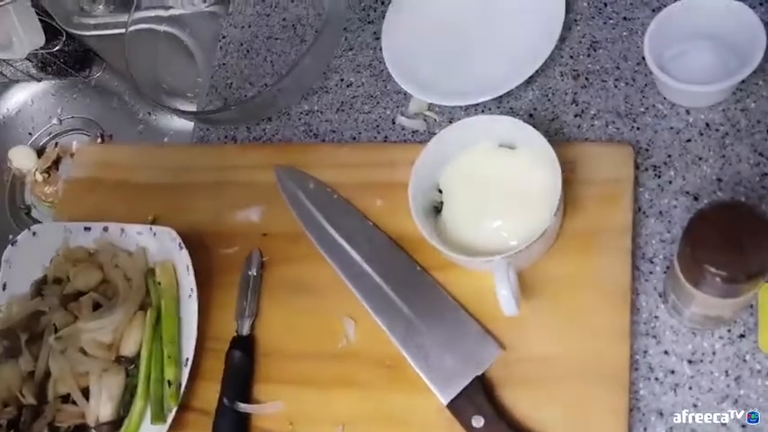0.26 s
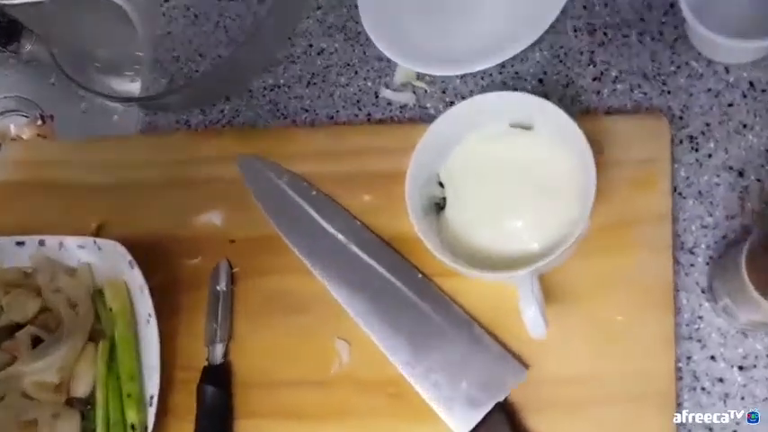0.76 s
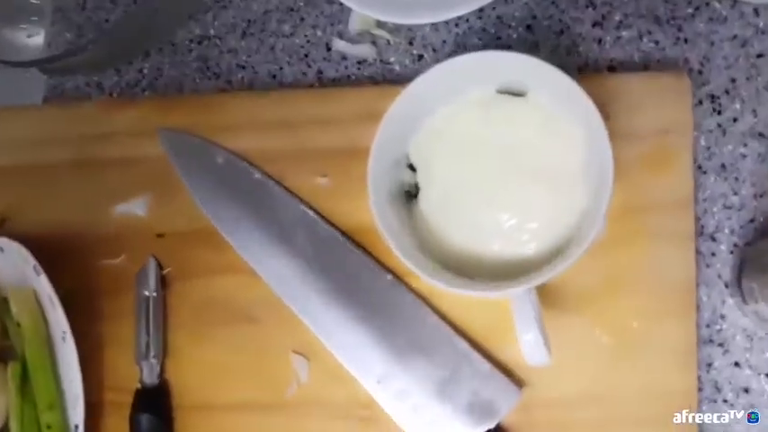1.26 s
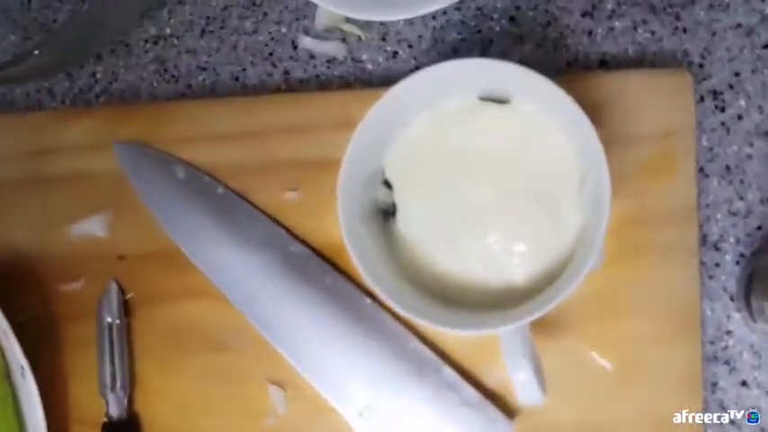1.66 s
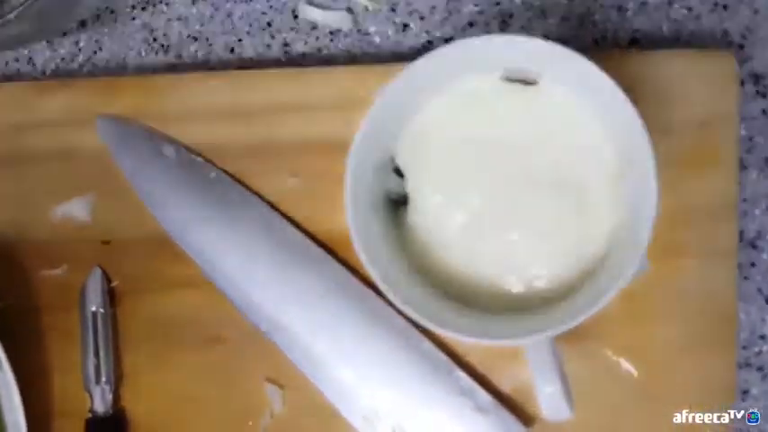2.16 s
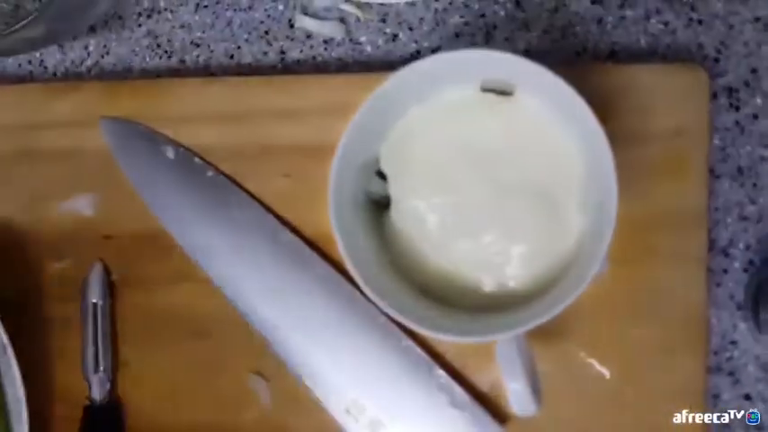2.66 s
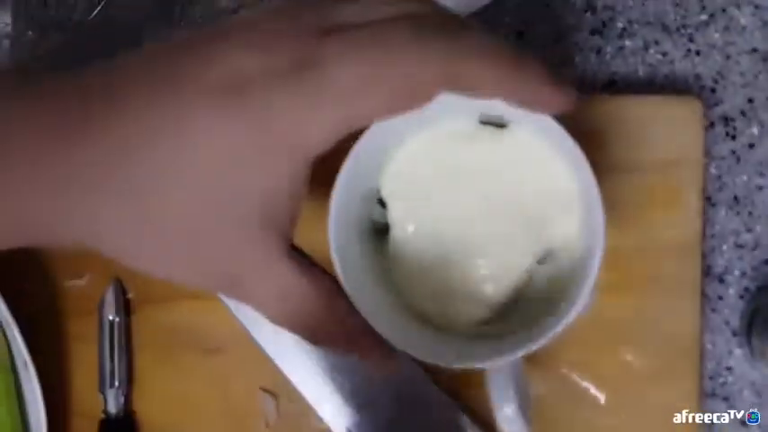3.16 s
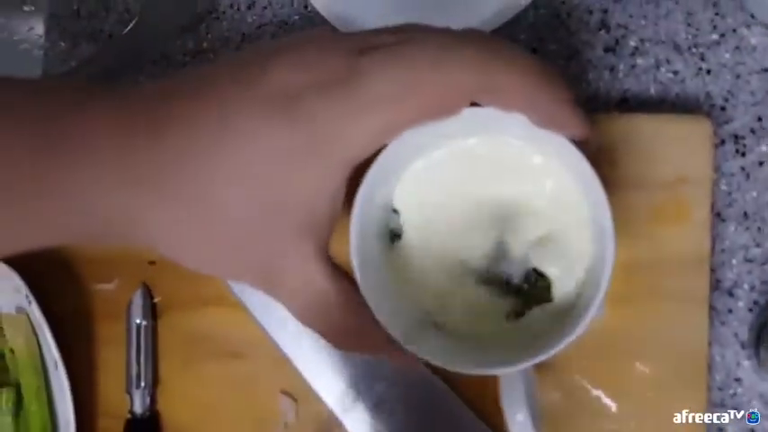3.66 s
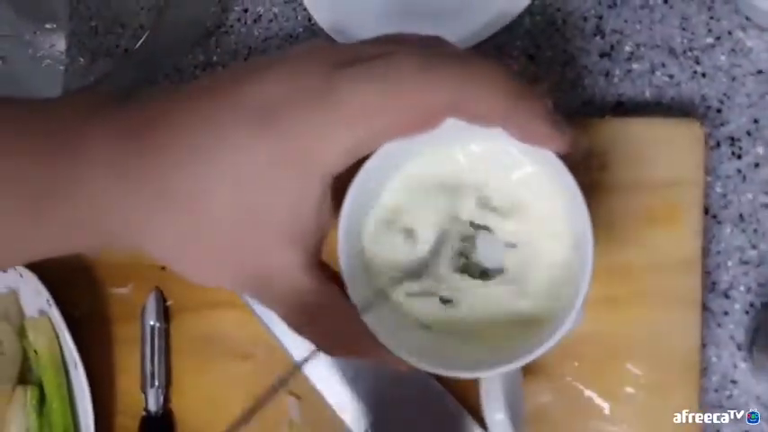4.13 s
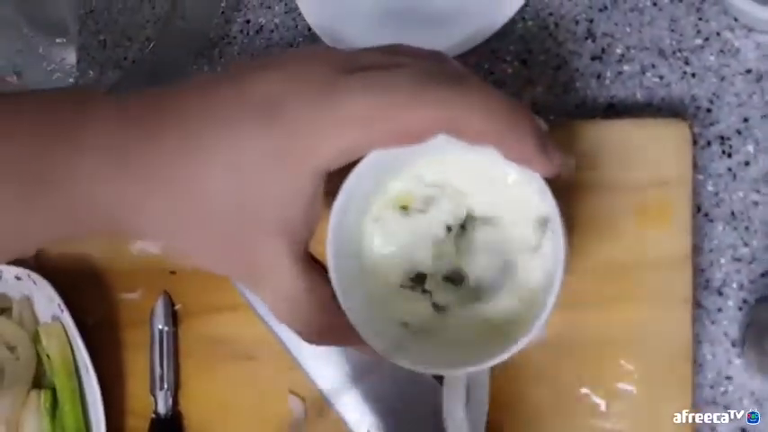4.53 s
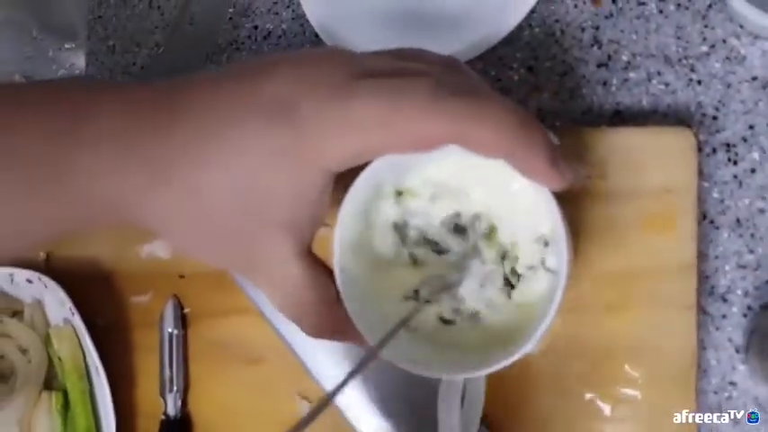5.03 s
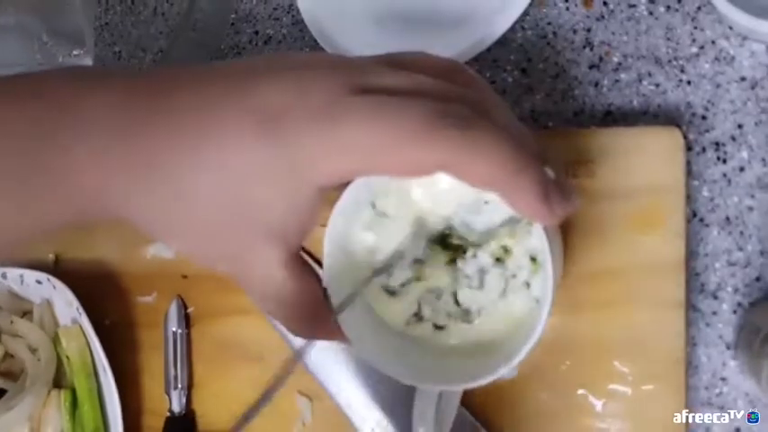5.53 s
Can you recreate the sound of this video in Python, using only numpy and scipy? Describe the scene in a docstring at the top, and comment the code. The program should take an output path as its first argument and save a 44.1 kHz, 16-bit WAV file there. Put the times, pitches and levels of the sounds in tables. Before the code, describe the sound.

In a small kitchen, a wooden drawer rolls open and steel cutlery slides, clashes and rings as someone rummages, ending in a few dull knocks. After a pause with only a low appliance hum, a hand brushes a ceramic cup on a wooden board. A metal spoon then stirs thick sauce, tapping the cup about four times a second with damped clinks, faint scrapes and squelches, heard from close by.

```python
"""Steel cutlery slides and clashes as someone rummages for a spoon; the wooden drawer rumbles.
A hand then steadies a ceramic cup on a wooden board and the spoon stirs thick sauce, tapping the wall
about four times a second. Sauce and hand damp the cup. A small kitchen echoes; an appliance hums."""
import sys
import numpy as np
from scipy import signal
from scipy.fft import rfft, irfft, next_fast_len
from scipy.io import wavfile
from scipy.ndimage import uniform_filter1d, map_coordinates

SR = 44100
rng = np.random.default_rng(int(sys.argv[2]) if len(sys.argv) > 2 else 0)


def generate_wav(sig):
    """Save sig (samples, or channels by samples) to the path in sys.argv[1] as 16-bit PCM at SR."""
    pcm = np.round(np.clip(np.atleast_2d(sig).T, -1, 1) * 32767).astype(np.int16)
    wavfile.write(sys.argv[1], SR, pcm)


N = 255339
T = np.arange(SR // 2) / SR  # time axis of one blow [s]

# shoves of the pile: (time [s], length [s], rattle level [dB])
SHOVES = [(0.493, 0.033, -45.5), (0.523, 0.027, -38.5), (0.762, .035, -44), (0.828, 0.024, -36),
          (0.894, 0.094, -33.5), (1.006, .09, -40.5), (1.117, 0.055, -36.5), (1.228, 0.13, -51),
          (1.346, 0.035, -41), (1.444, 0.18, -39), (1.58, 0.059, -36.5)]
# cutlery modes: (frequency [Hz], relative level [dB], unchoked t60 [s])
STEEL_MODES = [(1770, -7, 0.18), (1975, -13, 0.13), (2193, -6, 0.19), (2283, -9, .18), (2730, -10.5, .14),
               (3082, -4.5, .14), (3554, -10.5, .1), (3640, -8.5, .1), (4240, -4, .16), (4430, -10, .14),
               (4600, -3.5, .12), (4730, 0.5, .13), (5040, -1, .14), (5360, -11, 0.22), (5807, -13, .16),
               (6020, -9, 0.18), (6460, -6, 0.1617), (7610, 2.5, 0.073), (7630, -7.5, .12),
               (7874, -5.5, 0.088), (8850, -9, .12), (8640, 9, .12), (8940, -3.5, 0.26), (9256, -14, 0.1)]
# spoon on cup: (time [s], click [dB], hollow [dB], spoon [dB], spoon pitch [Hz], rasp t60 [s])
TAPS = [(3.3338, -44.5, -46, -40.5, 6560, 0.027), (3.553, -65, -62, -57, 6370, 0.017),
        (3.6061, -37.5, -40.5, -35, 2920, 0.022), (4.1541, -42.5, -38, -34.5, 5700, .04),
        (4.4303, -50, -42.5, -42, 5480, 0.042), (4.505, -73.5, -83.5, -55, 5510, 0.015),
        (4.6753, -48.5, -38, -31.5, 5460, 0.026), (4.906, -52, -52.5, -54, 4900, .03),
        (4.9306, -39, -39.5, -41.5, 3750, 0.014), (5.1519, -33.5, -33.5, -25.5, 3550, 0.03),
        (5.367, -54.5, -52, -52, 4500, 0.019), (5.3869, -37, -43, -31.5, 4670, 0.016),
        (5.6525, -42, -33.5, -33, 6220, 0.021)]


def amp(db):
    """dB to gain."""
    return 10 ** (np.asarray(db) / 20)


def unit(x):
    """x at rms 1."""
    return x / np.sqrt(np.mean(x ** 2) + 1e-20)


def along(points, hz):
    """Interpolate (Hz, value) points on a log axis."""
    f, v = np.transpose(points)
    return np.interp(np.log(hz + 1), np.log(f + 1), v)


def wobble(rate_hz):
    """Smooth random curve."""
    knots = rng.standard_normal(int(N * rate_hz / SR) + 4)
    return map_coordinates(knots, [np.arange(N) * rate_hz / SR])


def filtered(x, response):
    """x through the gain response(hz)."""
    size = next_fast_len(len(x) + SR // 4)
    return irfft(rfft(x, size) * response(np.fft.rfftfreq(size, 1 / SR)), size)[:len(x)]


def coloured(x, spectrum):
    """x shaped by (Hz, dB) points, at rms 1."""
    return unit(filtered(x, lambda hz: amp(along(spectrum, hz))))


def add(track, time_s, sound):
    """Mix a sound into the track."""
    part = track[round(time_s * SR):][:len(sound)]
    part += sound[:len(part)]


def grains(per_s, size=N):
    """Tiny random contacts."""
    return rng.standard_normal(size) * (rng.random(size) < per_s / SR)


def stroke(time_s, length_s, db, attack_s, release_db_per_s, sag_db_per_s=0):
    """Gain of one movement: swell, hold with optional sag, release."""
    t = np.arange(N) / SR - time_s
    sag_db = sag_db_per_s * np.clip(t, 0, length_s)
    release_db = release_db_per_s * np.maximum(t - length_s, 0)
    return np.clip(t / attack_s, 0, 1) * amp(db - sag_db - release_db)


def power_sum(gains):
    """Overlapping movements add in power."""
    return np.linalg.norm(gains, axis=0)


def resonance(hz, q):
    """One noise-driven resonance."""
    return signal.lfilter(*signal.iirpeak(hz, q, SR), rng.standard_normal(len(T)))


def ring(modes, scatter_db, detune):
    """Decaying modes; level and pitch scatter from blow to blow."""
    hz, db, t60_s = np.transpose(modes)[:, :, None]
    hz = hz * (1 + detune * rng.standard_normal(hz.shape))
    db = db + scatter_db * rng.standard_normal(db.shape)
    partials = np.sin(2 * np.pi * (hz * T + rng.random(hz.shape)))
    return np.sum(amp(db - 60 * T / t60_s) * partials, axis=0)


def notes(rows, attack_s):
    """One decaying sine per row."""
    out = np.zeros(N)
    for time_s, db, hz, t60_s in rows:
        envelope = amp(db - 60 * T / t60_s) * (1 - np.exp(-T / attack_s))
        add(out, time_s, envelope * np.sin(2 * np.pi * hz * T))
    return out


def voiced(blow, bands_hz, levels_db):
    """Where and how hard a blow lands sets its band levels, taken over the first 10 ms."""
    size = SR // 100
    hz = np.fft.rfftfreq(size, 1 / SR)
    power = 2 * np.abs(rfft(blow[:size]) / size) ** 2
    band = np.argmin(np.abs(hz[:, None] - np.array(bands_hz)), axis=1)
    gain_db = np.array(levels_db) - 10 * np.log10(np.bincount(band, power) + 1e-20)
    return filtered(blow, lambda f: amp(np.interp(f, bands_hz, gain_db)))


def shifting(x, depth_db):
    """Resonances shift as the contact point moves: random gain patches in time and frequency."""
    spectra = signal.stft(x, nperseg=512)[2]
    patches = uniform_filter1d(rng.standard_normal(spectra.shape), size=3, axis=0)
    patches = uniform_filter1d(patches, size=5, axis=1)
    gain = unit(amp(depth_db * unit(patches)))
    return signal.istft(spectra * gain, nperseg=512)[1][:len(x)]


def kitchen(x, early_db, early_t60_s, late_db):
    """x plus quick echoes off worktop and walls, and the room's tail."""
    # room decay: (frequency [Hz], t60 [s])
    decay = [(150, 0.12), (1000, 0.37), (4000, 0.26), (9000, 0.26)]
    hz, t, spectra = signal.stft(rng.standard_normal(len(T)), SR, nperseg=256)
    tail = signal.istft(spectra * amp(-60 * t / along(decay, hz)[:, None]), SR, nperseg=256)[1][:len(T)]
    early = rng.standard_normal(len(T)) * amp(-60 * T / early_t60_s)
    onset = 1 - np.exp(-(T / 0.0005) ** 2)
    echo = onset * (amp(early_db) * unit(early) + amp(late_db) * unit(tail)) / np.sqrt(len(T))
    return x + signal.fftconvolve(x, echo)[:len(x)]


def background():
    """An appliance hums unsteadily over the room's low rush."""
    # appliance tones: (frequency [Hz], relative level [dB])
    tones = [(59.2, -76), (91.5, -74.5), (220.7, -68.5), (274.5, -80)]
    # room rush: (frequency [Hz], relative level [dB])
    rush_spectrum = [(12, -50), (20, -23.5), (43, -7.5), (99, 0.5), (166, -16), (221, -2.5), (301, -26.5),
                     (400, -20.5), (532, -29.5), (847, -28), (1120, -37), (3990, -34), (4660, -35),
                     (6350, -36.5), (9600, -37), (12500, -74.5), (21100, -120)]
    hum = np.zeros(N)
    for hz, db in tones:
        peak = np.sqrt(2) * amp(db + 1.5 * wobble(8.4))
        hum += peak * np.sin(2 * np.pi * hz * np.arange(N) / SR + 2.6 * wobble(8))
    return amp(2) * hum + amp(-59.5) * coloured(rng.standard_normal(N), rush_spectrum)


def drawer():
    """The drawer rolls open on its runners; its wooden box rumbles with each shove."""
    # opening pull: (time [s], length [s], level [dB])
    pull = (0, 0.25, -60.5)
    # runners and box: (frequency [Hz], relative level [dB])
    runner_spectrum = [(60, -10), (200, -14), (290, -0.5), (410, 3.5), (560, -11), (1000, -28),
                       (1800, -18.5)]
    box_spectrum = [(40, -21.5), (105, 2.5), (220, -4.5), (290, -10), (410, -3), (700, -14), (830, -10.5),
                    (1100, -28), (1800, -37)]
    rolling = stroke(*pull, attack_s=0.03, release_db_per_s=70)
    rolling *= coloured(rng.standard_normal(N), runner_spectrum)
    level = power_sum([
        stroke(time_s, length_s, -52.5 + 0.6 * (db + 40), attack_s=0.03, release_db_per_s=200)
        for time_s, length_s, db in SHOVES])
    rumble = level * amp(0.5 * wobble(25)) * coloured(rng.standard_normal(N), box_spectrum)
    return kitchen(rolling + rumble, early_db=-6.5, early_t60_s=0.12, late_db=-9.5)


def steel_ring():
    """One piece rings, choked by the pile."""
    return ring(STEEL_MODES, scatter_db=3, detune=0.018) * amp(-60 * T / 0.45)


def clashes():
    """Loose pieces chatter for a few ms, then ring on, half pinned by their neighbours."""
    # steel on steel: (time [s], strength [dB], brightness [dB], chatter [s], relative after-ring [dB])
    hits = [(0.49, -46.5, 9.5, 0.008, -13), (0.498, -44.5, 7.5, 0.007, -15), (0.529, -38, 5, 0.0035, -16),
            (0.54, -33.5, 5.5, 0.009, -12), (0.55, -35, -0.5, 0.012, -14), (0.773, -45, 3.5, 0.012, -13),
            (0.787, -43, 0.5, 0.012, -15), (0.8435, -33.5, -4, 0.004, -17.5), (0.894, -39, -4.5, 0.008, -4),
            (0.906, -35.5, -9, 0.01, -15), (0.925, -35, -5, 0.008, -5), (0.945, -31.5, -3, 0.009, -11),
            (0.954, -35, 1, 0.009, -6), (1.0325, -37, -7, 0.003, -18), (1.086, -43, 2, 0.01, -17),
            (1.121, -40, -1.5, 0.0093, -26), (1.239, -51, 1.5, 0.006, -19.5),
            (1.252, -48, -2.5, 0.008, -18), (1.302, -45, 4, 0.006, -15.5),
            (1.3488, -33, -0.5, 0.007, -18.5), (1.444, -34, 6.5, 0.004, -19.5),
            (1.496, -36.5, 0, 0.0048, -14.5), (1.5195, -28, 14, 0.0048, -21), (1.548, -36, -2, 0.008, -17),
            (1.588, -32, 6, 0.008, -11), (1.596, -33, 4, 0.009, -14)]
    # steel bands: (centre [Hz], offset from strength [dB], share of brightness [ratio])
    bands = [(2494, -7, 0.15), (5200, -0.5, 0), (7500, -1, 1), (8700, -3, 0.2)]
    bands_hz, offset_db, share = np.transpose(bands)
    out = np.zeros(N)
    for time_s, strength_db, bright_db, chatter_s, after_db in hits:
        chatter = (1 - np.exp(-T / 0.002)) * np.exp(-(T / chatter_s) ** 4)
        # no two pieces are tuned alike
        buzz = sum(amp(db) * resonance(hz * (1 + 0.012 * rng.standard_normal()), q=hz / 220)
                   for hz, db, _ in STEEL_MODES)
        contact = unit(shifting(buzz, depth_db=3.5)) + amp(-15) * rng.standard_normal(len(T))
        blow = chatter * contact + amp(after_db) * steel_ring()
        blow = voiced(blow, bands_hz, strength_db + offset_db + share * bright_db)
        add(out, time_s, kitchen(blow, early_db=-8.5, early_t60_s=0.065, late_db=-13))
    return out


def rattle():
    """Shoved pieces slide: many small contacts scrape and ring."""
    # sliding steel: (frequency [Hz], gain [dB])
    slide_spectrum = [(180, -42.5), (300, -15.5), (437, -9.5), (477, -16), (544, -0.5), (793, 1.5),
                      (1000, -13), (1170, -9), (1840, -2.5), (4320, -3.5), (4860, -5.5), (6490, -5),
                      (9600, -12), (12500, -22.5), (21100, -120)]
    level = power_sum([stroke(*shove, attack_s=0.014, release_db_per_s=381.5, sag_db_per_s=35)
                       for shove in SHOVES])
    out, pieces = np.zeros(N), 4
    for _ in range(pieces):
        contacts = level * unit(grains(500) * amp(4 * wobble(45))) / np.sqrt(pieces)
        ringing = signal.fftconvolve(contacts, unit(steel_ring()) / np.sqrt(len(T)))[:N]
        scraping = filtered(contacts, lambda hz: amp(along(slide_spectrum, hz)))
        out += amp(-4) * ringing + amp(7) * scraping
    return kitchen(shifting(out, depth_db=4.5), early_db=-6, early_t60_s=0.09, late_db=-10)


def pings():
    """Thin pieces are flicked and ring alone."""
    # flicks: (time [s], level [dB], pitch [Hz], t60 [s])
    flicks = [(.78, -44, 9250, 0.086), (.845, -29, 9330, 0.1), (.945, -30.5, 9238, 0.26),
              (1.49, -35, 2237, 0.2), (1.52, -30.5, 7620, 0.09), (1.59, -29.5, 7540, 0.2),
              (1.592, -32.5, 2280, 0.11)]
    return notes(flicks, attack_s=0.001)


def thuds():
    """Wood knocks dully: first the drawer, then the board under the cup."""
    # knocks: (time [s], level [dB], pitch [Hz], t60 [s])
    knocks = [(0.927, -41, 136, 0.13), (1.137, -36, 158.5, 0.1), (1.518, -29, 98, 0.058),
              (1.595, -39, 231, 0.19), (1.64, -33, 119, 0.15), (1.67, -37, 97, 0.16), (3.02, -48, 36, .3),
              (3.613, -42, 202.8, 0.27), (4.214, -32.5, 182, 0.04), (5.251, -39.5, 96, 0.14),
              (5.754, -43.5, 154, 0.14)]
    return notes(knocks, attack_s=0.0032)


def hand():
    """Skin rubs on wood and glaze: the hand lands on the board, then closes round the cup."""
    # touches: (time [s], length [s], level [dB], attack [s])
    touches = [(2.881, .035, -64.5, .006), (2.937, 0.12, -64.5, 0.024), (3.103, .12, -57.5, 0.077)]
    # skin friction: (frequency [Hz], relative level [dB])
    skin_spectrum = [(200, -10.5), (500, -7), (760, -1), (950, -9.5), (1300, -17.5), (4000, -16)]
    level = power_sum([stroke(*touch, release_db_per_s=75) for touch in touches])
    return level * amp(1.6 * wobble(31)) * coloured(rng.standard_normal(N), skin_spectrum)


def sauce():
    """The spoon drags grittily, more so round hard taps; air pockets smack as the sauce parts."""
    # first stroke, along the bottom and up the wall: (time [s], length [s], level [dB])
    scrapes = [(3.318, 0.13, -65), (3.422, 0.072, -58.5), (3.548, 0.043, -57)]
    # spoon drag: (frequency [Hz], relative level [dB])
    drag_spectrum = [(250, -24), (700, -7), (1000, -5), (1500, -4), (1900, -8), (2500, -0.5), (3400, -19),
                     (4400, -1.5), (5300, -10), (6400, -2.5), (7500, -9), (9600, -15)]
    # sauce parting: (time [s], level [dB], length [s], bubble pitch [Hz])
    squelches = [(3.352, -58, 0.058, 1490), (3.402, -53, 0.045, 1240), (4.163, -52.5, 0.044, 1190),
                 (4.201, -53.5, 0.047, 587), (4.683, -56, 0.059, 1140), (4.939, -46.5, 0.027, 2780),
                 (5.166, -58.5, 0.055, 1082), (5.409, -45, 0.03, 2360)]
    lead_s, hold_s = 0.096, 0.052
    median_db = np.median([click_db for _, click_db, *_ in TAPS])
    moves = [stroke(*scrape, attack_s=0.024, release_db_per_s=202) for scrape in scrapes]
    for time_s, click_db, *_ in TAPS:
        drag_db = -67.5 + 0.27 * (click_db - median_db)
        moves.append(stroke(time_s - lead_s, lead_s + hold_s, drag_db, lead_s, release_db_per_s=149))
    out = power_sum(moves) * amp(4.6 * wobble(30)) * coloured(grains(1200), drag_spectrum)
    for time_s, db, length_s, hz in squelches:
        bubble_spectrum = [(hz / 5, -9), (hz / 1.54, -2), (hz, 0), (hz * 2.6, -17), (hz * 8, -30)]
        pockets = coloured(grains(1800, len(T)), bubble_spectrum)
        swell = np.sin(np.pi * np.minimum(T / length_s, 1))
        add(out, time_s, amp(db) * swell * pockets)
    return kitchen(shifting(out, depth_db=4), early_db=-4, early_t60_s=0.11, late_db=-12.5)


def taps():
    """Spoon hits wall: click, spoon rasp, ring of the air above the sauce, choked cup, board knock."""
    # full, hand-held cup: (frequency [Hz], relative level [dB], t60 before choking [s])
    cup_modes = [(776, -1, 0.042), (1248, -10.5, 0.053), (1338, 0.5, 0.075), (1643, -12, 0.039),
                 (2342, 11.5, 0.041), (2960, 11.5, 0.024), (3430, -50, .04), (4100, -45, 0.026),
                 (4710, -2, 0.12), (5000, -30, 0.03), (5650, 7.5, 0.059), (6276, 17, 0.02),
                 (6820, 3, 0.059), (7650, -32, .03), (8760, 12.5, 0.048), (9474, 17.5, 0.011)]
    # hollow, click, spoon and top bands: (centre [Hz])
    bands_hz = [1350, 3000, 5600, 8400]
    # spoon click and board: (frequency [Hz], relative level [dB])
    click_spectrum = [(150, -37), (600, -1), (950, -11.5), (1320, 6.5), (1900, -0.5), (3000, 3.5),
                      (9000, -2.5)]
    board_spectrum = [(60, -12), (130, 9), (250, -4), (450, -13.5), (750, -6), (1100, -22), (2000, -26)]
    out = np.zeros(N)
    for time_s, click_db, hollow_db, spoon_db, spoon_hz, rasp_t60_s in TAPS:
        click = coloured(rng.standard_normal(len(T)), click_spectrum) * amp(13 - 60 * T / 0.018)
        rasp = unit(resonance(spoon_hz, q=9.4)) * amp(12.5 - 60 * T / rasp_t60_s)
        hollow = unit(resonance(hz=1393, q=5.2)) * amp(-1.5 - 60 * T / 0.046)
        cup = ring(cup_modes, scatter_db=2, detune=0.02) * amp(-60 * T / 0.09)
        blow = (click + rasp + hollow + amp(-10) * cup) * (1 - np.exp(-T / 0.0023))
        blow = voiced(blow, bands_hz, [hollow_db, click_db, spoon_db, click_db - 0.5])
        knock_level = amp(hollow_db - 14 - 60 * T / 0.54) * (1 - np.exp(-T / 0.0077))
        knock = knock_level * coloured(rng.standard_normal(len(T)), board_spectrum)
        add(out, time_s, kitchen(blow + knock, early_db=-8.5, early_t60_s=0.13, late_db=-17))
    return out


def board_thumps():
    """The board thumps under each tap, following the cup's hollow level."""
    lag_s, pitch_hz, t60_s = 0.0051, 144.4, 0.16
    thumps = [(time_s + lag_s, -46 + 0.53 * (hollow_db + 40), pitch_hz, t60_s)
              for time_s, _, hollow_db, *_ in TAPS]
    return notes(thumps, attack_s=0.0036)


def scene():
    """Mono mix."""
    rummaging = drawer() + clashes() + rattle() + pings()
    stirring = hand() + sauce() + taps() + board_thumps()
    return (background() + rummaging + thuds() + stirring)[None]


def record(dry):
    """Steep low-pass at the recorder's band limit."""
    limit_hz = 9680
    return np.array([filtered(x, lambda hz: 1 / np.sqrt(1 + (hz / limit_hz) ** 160)) for x in dry])


dry = scene()
out = record(dry)
generate_wav(out)
```